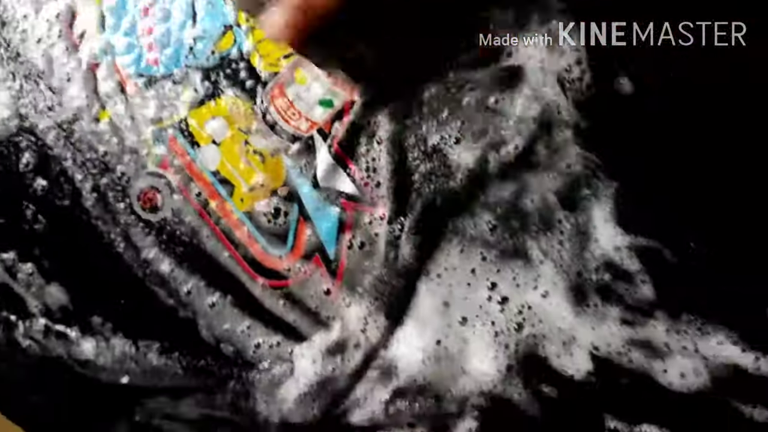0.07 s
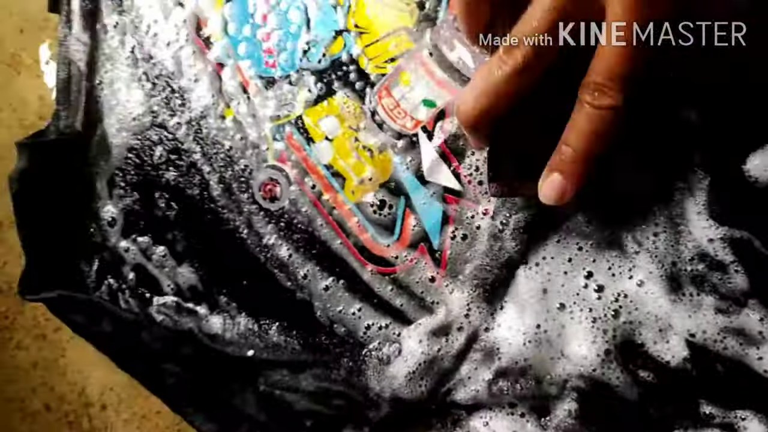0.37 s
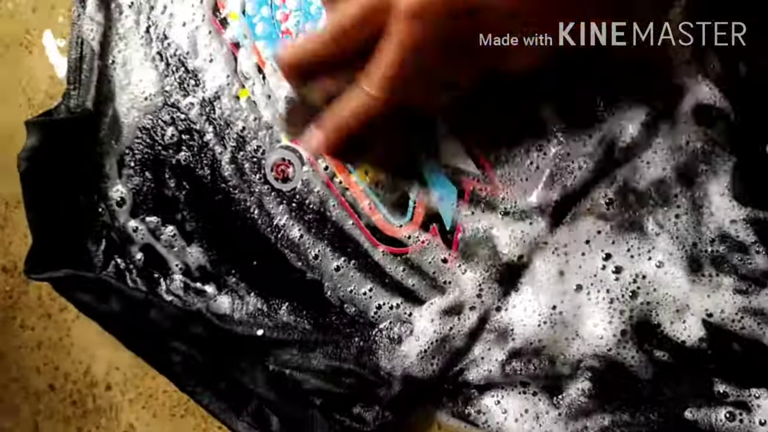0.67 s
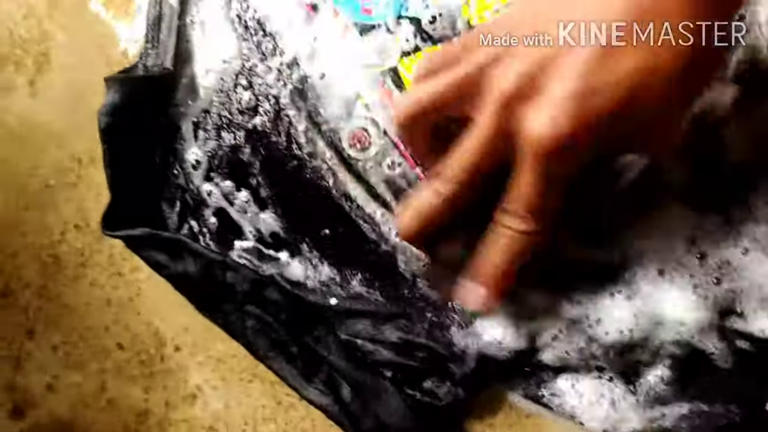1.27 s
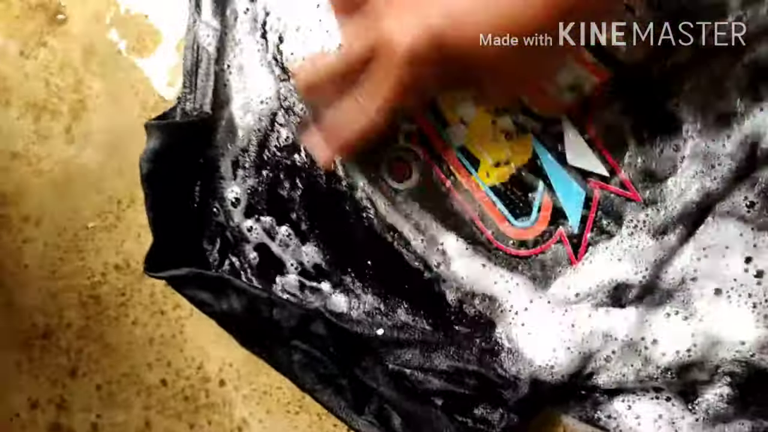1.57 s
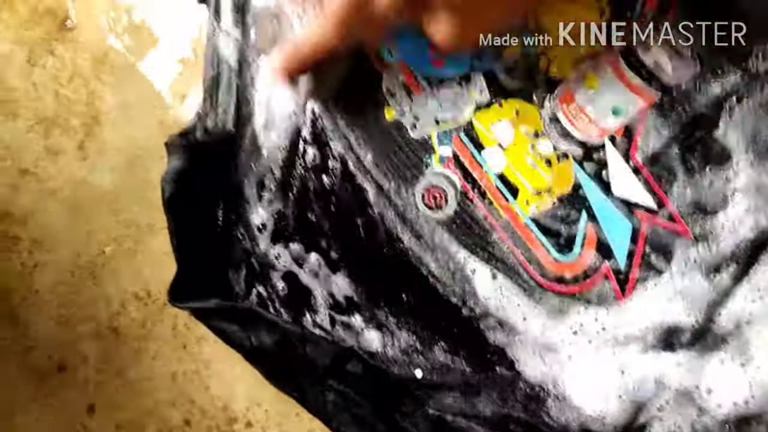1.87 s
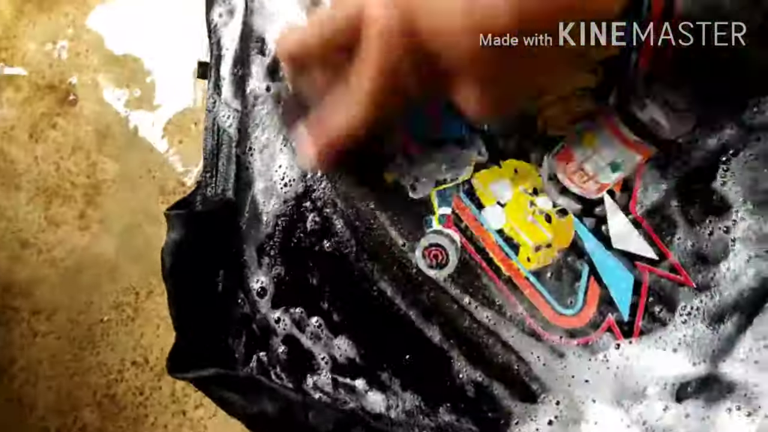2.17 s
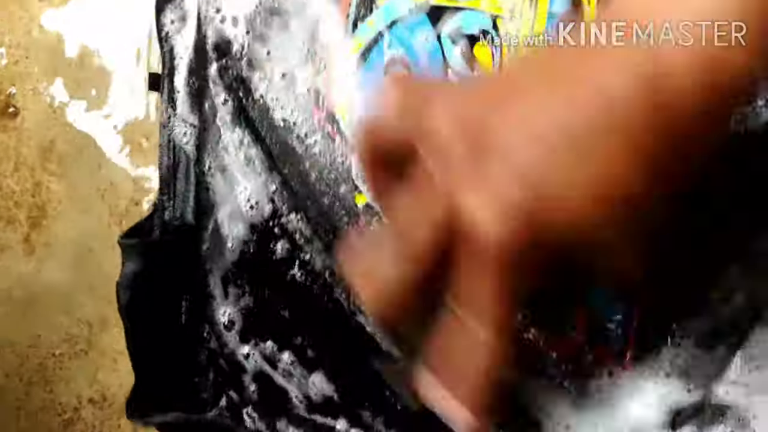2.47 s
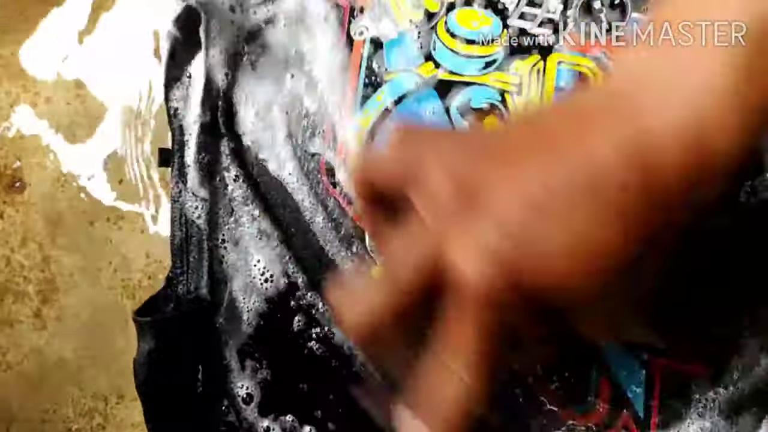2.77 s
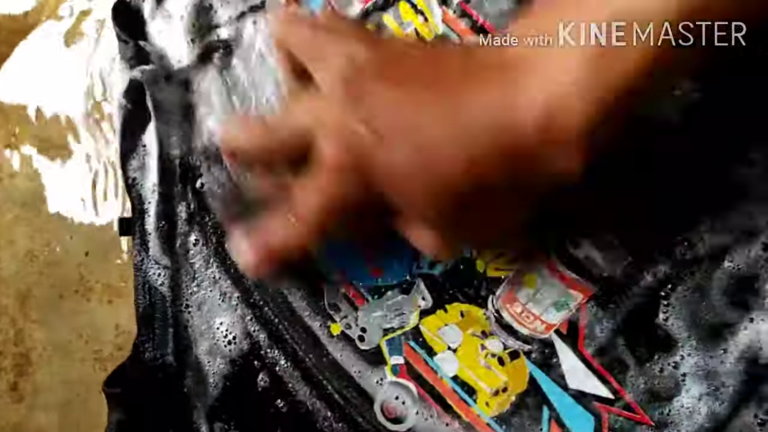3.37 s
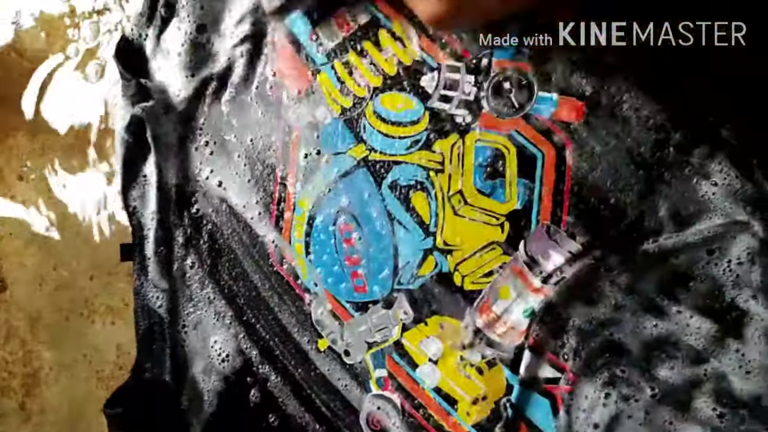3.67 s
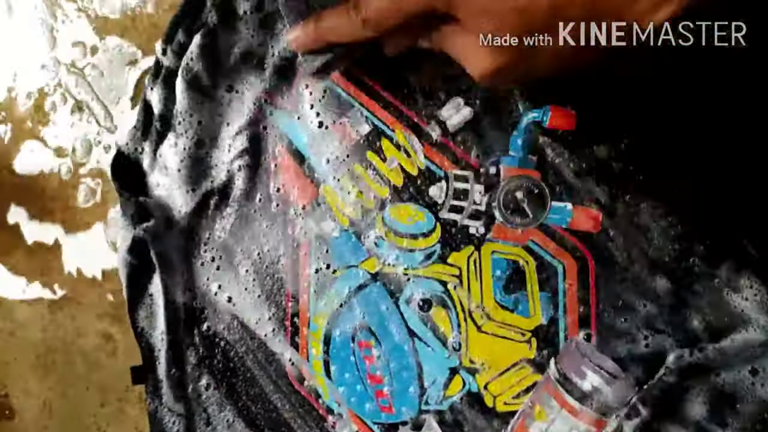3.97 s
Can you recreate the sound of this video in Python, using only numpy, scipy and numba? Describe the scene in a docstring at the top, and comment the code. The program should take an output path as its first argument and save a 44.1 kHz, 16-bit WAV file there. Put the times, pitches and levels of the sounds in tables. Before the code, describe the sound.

Wet, soapy cloth is scrubbed by hand in fast back-and-forth strokes, heard up close with short floor echoes. Foam crackles and water squishes through the fabric, strongest past the middle, over a faint low hum.

```python
"""Wet, fizzing strokes, close to the microphone: a hand scrubs a soaked, soapy shirt on a hard floor.
Each stroke bursts tiny foam bubbles and squeezes water through the cloth, a squelch that rises in pitch
with the speed of the hand and ends in a slurp as it turns. Now and then a full fold gives way and spurts.
Far off, a motor hums and faint whines come and go over a low rumble.
Heard in stereo through two microphone ports, with short echoes from the floor and nearby walls."""
import sys
import numpy as np
from scipy import signal
from scipy.fft import rfft, irfft
from scipy.io import wavfile
from scipy.ndimage import uniform_filter1d
from numba import njit

SR = 44100
rng = np.random.default_rng(int(sys.argv[2]) if len(sys.argv) > 2 else 0)


def generate_wav(signal):
    """Clip the signal to [-1, 1] and save it as 16-bit WAV at the path in sys.argv[1]."""
    frames = np.transpose(np.atleast_2d(signal))
    scaled = np.clip(frames, -1, 1) * 32767
    pcm = np.round(scaled).astype(np.int16)
    wavfile.write(sys.argv[1], SR, pcm)


N = 176400

# strokes of the hand: start t/s, end t/s, place of top speed/share of the stroke,
# relative foam level/dB, relative squelch level/dB, squelch f/Hz at top speed
STROKES = [ (0.008, 0.104, 0.65, -27.5, -35.5, 1670), (0.118, 0.218, 0.53, -26, -34, 2110),
           (0.237, 0.306, 0.55, -26, -34, 2180), (0.323, 0.432, 0.79, -27, -37, 2060),
           (0.448, 0.524, 1, -27, -29, 2170), (0.55, 0.64, 0.37, -33.5, -37.5, 2120),
           (0.648, 0.761, 0.59, -34, -42.5, 1830), (0.761, 0.864, 0.34, -32.5, -37, 2230),
           (0.878, 0.966, 0.51, -26.5, -35, 2160), (0.972, 1.067, 0.38, -29.5, -33, 2590),
           (1.095, 1.203, 0.35, -23.5, -28, 2250), (1.197, 1.302, 0.56, -25, -30.5, 2170),
           (1.335, 1.439, 0.39, -22, -28, 2590), (1.444, 1.553, 0.34, -23.5, -29, 2290),
           (1.561, 1.669, 0.54, -21, -27.5, 2275), (1.672, 1.79, 0.48, -23, -25.5, 2110),
           (1.803, 1.92, 0.45, -19.5, -24.5, 2160), (1.925, 2.055, 0.44, -19.5, -22.5, 2434),
           (2.059, 2.195, 0.49, -18, -26, 2570), (2.189, 2.328, 0.58, -18, -24.5, 2470),
           (2.337, 2.471, .45, -18.5, -24.5, 2750), (2.468, 2.618, 0.6, -18, -25.5, 2700),
           (2.624, 2.773, 0.45, -17.5, -24.5, 2710), (2.767, 2.928, 0.64, -16.5, -29.5, 3220),
           (2.926, 3.077, 0.49, -19, -25, 2970), (3.075, 3.247, 0.42, -19, -28.5, 2900),
           (3.227, 3.391, 0.64, -21, -31, 3280), (3.402, 3.577, 0.29, -21.5, -29.5, 2860),
           (3.558, 3.742, 0.61, -26.5, -27.5, 1967), (3.728, 3.935, 0.46, -29.5, -31, 1860),
           (3.905, 4.078, 0.31, -26, -28.5, 2430)]
# hand speed at which the foam is half released: t/s, speed/share of top speed
RELEASE_SPEED = [(.6, 0.66), (1.2, 0.58), (2.2, 0.62), (3.3, 0.54)]
# spectrum of the bursting foam: f/Hz, relative level/dB
FOAM_SPECTRUM = [(250, -23), (550, -45), (900, -20), (1400, -16.5), (2800, -1.5), (3600, -4.5), (4800, -3),
                 (6500, -2.5), (8300, 2), (10000, 4.5), (11400, 2), (13000, -11), (15500, -17.5)]
# flicker of the fizz, steadier in the high treble: f/Hz, level spread/dB
FIZZ_FLICKER = [(4000, 4.2), (9000, 2.4)]
# dull rub of the cloth, heaviest in the sodden folds: t/s, level/dB relative to the water flow
CLOTH_RUB = [(0, -15), (.7, -9.5), (1.2, -20), (3.5, -26), (4, -17)]
# folds full of water giving way: t/s, relative level/dB, f/Hz
SPURTS = [(0.062, -34, 1410), (0.177, -29.5, 2040), (0.279, -26.5, 1900), (0.403, -27, 1930),
          (0.606, -25.5, 1890), (0.684, -30, 1750), (1.458, -40, 2060), (3.354, -26.5, 2040),
          (3.424, -31, 3100), (3.613, -21.5, 1610), (3.700, -30, 1610), (3.939, -25.5, 1880)]
# running speed of the distant motor: t/s, rotation f/Hz
MOTOR_SPEED = [(0, 17.5), (.3, 19.2), (.6, 20), (2.8, 19.9), (3.2, 18.6), (4, 18.2)]
# swell of its hum: t/s, gain/dB
MOTOR_SWELL = [(0, -6), (.6, 0), (1.5, 0.5), (1.9, 4.5), (2.3, -1.5), (2.7, 1.5), (3.2, 0.5), (3.6, -6)]
# its harmonics: multiple of the rotation, level/dB before the swell
MOTOR_HARMONICS = [(5, -58.5), (6, -59), (7, -55), (11, -62.5), (13, -64.5), (17, -64.5)]
# far-off whines and hums: start t/s, end t/s, f/Hz, level/dB
WHINES = [(-.1, .3, 399, -61), (.45, 2.45, 160.3, -50), (.68, 1.08, 564, -61), (2.3, 2.75, 481, -63),
          (2.7, 3.1, 462, -62), (3.25, 3.9, 323, -60)]
# spectrum of the background rumble: f/Hz, relative level/dB
RUMBLE_SPECTRUM = [(25, -4), (55, -3.5), (100, -3), (160, 5.5), (230, -2), (330, -4), (600, -16),
                   (1400, -13.5), (3000, -9), (12000, -23.5)]
# balance of the microphone ports: f/Hz, left minus right level/dB
PORT_BALANCE = [(100, 1.2), (330, 4.5), (1200, -.3), (2400, 1.2), (4400, 1), (8100, -.5), (10500, 1.5),
                (12500, 5)]

TURN_HZ, TOP_HZ = 1506.0, 15700  # squelch pitch as the hand turns; upper limit of the microphone


def undb(db):
    """Decibels to amplitude."""
    return 10 ** (np.asarray(db) / 20)


def unit(x):
    """Scale to an RMS of 1."""
    return x / np.sqrt(np.mean(x ** 2) + 1e-18)


def curve(x, points):
    """Value at x on straight lines between the points."""
    return np.interp(x, *np.array(points).T)


def response(points):
    """Gain at each frequency for points of f/Hz, level/dB."""
    hz, db = np.array(points, float).T
    return undb(np.interp(np.log(np.arange(N // 2 + 1) * SR / N + 1), np.log(hz), db))


def colour(x, points):
    """Give a sound a spectrum, at unit level."""
    return unit(irfft(rfft(x) * response(points), N))


def walk(per_s):
    """Smooth random drift with a spread of 1."""
    hold = max(int(SR / per_s), 1)
    steps = np.repeat(rng.standard_normal(N // hold + 1), hold)
    return unit(uniform_filter1d(steps, hold)[:N])


@njit
def bandpass(x, hz, width):
    """Band-pass with a moving centre; width is a share of the centre."""
    y, band_state, low_state = np.empty(len(x)), 0., 0.
    for i in range(len(x)):
        g = np.tan(np.pi * hz[i] / SR)
        band = (band_state + g * (x[i] - low_state)) / (1 + g * (g + width))
        band_state = 2 * band - band_state
        low_state += 2 * g * band
        y[i] = width * band
    return y


def cavity(x, hz, width):
    """A steep-sided resonance of a wet pocket in the cloth."""
    hz = np.clip(hz * np.ones(N), 50, SR / 3)
    return unit(bandpass(bandpass(x, hz, float(width)), hz, float(width)))


def pops(per_s, spread_db):
    """Random clicks of uneven size."""
    size = undb(spread_db * np.minimum(rng.exponential(size=N), 6)) * rng.choice([-1, 1], N)
    return unit(size * (rng.random(N) < per_s / SR))


def ports(source, shared=0.21, lag_s=0.00007):
    """Two microphone ports hear a wide source partly alike, the left a little later."""
    common, left, right = source(), source(), source()
    late = np.roll(common, round(lag_s * SR))
    return np.sqrt(shared) * np.array([late, common]) + np.sqrt(1 - shared) * np.array([left, right])


def hand(t, gather_db=3):
    """Each stroke speeds up and slows down; speed sets the foam, the water flow and the squelch pitch."""
    foam, flow, pitch = np.zeros(N), np.zeros(N), np.full(N, TURN_HZ)
    for start, end, top_place, foam_db, squelch_db, top_hz in STROKES:
        fastest = start + np.clip(top_place, .1, .9) * (end - start)
        i = slice(int(start * SR), int(end * SR))
        speed = np.abs(np.sin(np.pi * np.interp(t[i], [start, fastest, end], [0, .5, 1])))
        grip = (speed / curve(start, RELEASE_SPEED)) ** 3.76
        burst = grip / (1 + grip)
        foam[i] += undb(foam_db) * burst / burst.max()
        piled_db = gather_db * (t[i] - start) / (end - start)  # water piles up before the hand
        flow[i] += undb(squelch_db + piled_db) * speed ** 0.53
        pitch[i] += (top_hz - TURN_HZ) * speed ** 3.04
    return foam, flow, pitch


def flicker(x, band_hz=400):
    """The fizz flickers unevenly, each narrow band swelling and fading at random."""
    hz, spectrum, out = np.arange(N // 2 + 1) * SR / N, rfft(x), 0
    for centre in np.arange(0, TOP_HZ + band_hz, band_hz):
        band = irfft(spectrum * np.maximum(1 - np.abs(hz - centre) / band_hz, 0), N)
        swell_db = curve(centre, FIZZ_FLICKER) * np.minimum(walk(45), 2)
        out = out + band * undb(swell_db)
    return unit(out)


def fizz(foam):
    """Thousands of foam bubbles burst under the fingers, in clumps; hard strokes also rasp the weave."""
    lingering = 0.08 * uniform_filter1d(foam, int(.2 * SR))
    sizzle = flicker(ports(lambda: colour(pops(15000, spread_db=2), FOAM_SPECTRUM)))
    rasp_hz = 5180 * 2 ** (0.25 * walk(30))
    rasp = foam ** 2 / foam.max() * ports(lambda: cavity(pops(2300, spread_db=2.5), rasp_hz, width=0.26))
    clumps = undb(.7 * walk(450))
    return clumps * ((foam + lingering) * undb(-0.5) * sizzle + undb(-7.5) * rasp)


def bubbles(pitch, per_s, cycles, glide=0.0855, scatter_oct=0.2, spread_db=2.5):
    """Larger bubbles ring around the squelch pitch, each gliding up as it dies away."""
    out = np.zeros(2 * N)
    for when, size, scatter in rng.random((int(per_s * N / SR), 3)):
        i = int(when * N)
        hz = pitch[i] * 2 ** (scatter_oct * np.log(scatter / (1 - scatter)).clip(-2, 4))
        age = np.linspace(0, 4, int(4 * cycles * SR / hz) + 2)  # in decay times of `cycles` periods
        ring = np.exp(-age) * np.sin(2 * np.pi * cycles * age * (1 + glide * age / 2))
        out[i:i + len(age)] += undb(-spread_db * np.log(max(size, .01))) * ring
    return unit(out[:N])


def squelch(t, flow, pitch):
    """Soapy water is forced through the weave, with bubbles, wet squeaks and the dull rub of the cloth."""
    wavering = pitch * 2 ** (0.153 * walk(60))
    water = ports(lambda: cavity(pops(4000, spread_db=-1), wavering, width=1))
    rub = ports(lambda: cavity(pops(2500, spread_db=1.5), hz=1140, width=5.7))
    rub *= undb(curve(t, CLOTH_RUB))
    gulps = undb(1.6 * walk(90))
    froth = ports(lambda: bubbles(wavering, per_s=600, cycles=9.6))
    squeaks = ports(lambda: bubbles(wavering, per_s=60, cycles=16))
    return flow * gulps * (undb(-18) * water + undb(-17.5) * froth + undb(-14) * squeaks + rub)


def spurts(t, rise_s=0.0015, decay_s=0.013):
    """A fold full of water gives way: a sudden gush with a dull slap and a spray of foam."""
    level, pitch = np.zeros(N), np.full(N, TURN_HZ)
    for start, db, hz in SPURTS:
        age = np.maximum(t - start, 0)
        level += undb(db) * np.minimum(age / rise_s, 1) * np.exp(-age / decay_s)
        pitch[t >= start] = hz
    gush = ports(lambda: cavity(pops(2500, spread_db=4.5), pitch, width=1))
    slap = cavity(rng.standard_normal(N), hz=630, width=0.77)
    spray = ports(lambda: colour(pops(4200, spread_db=4), FOAM_SPECTRUM))
    return level * (gush + undb(-19) * slap + undb(5) * spray)


def slurps(t, centre_hz=1535.0, floor_hz=1150, mean_fall_oct_per_s=24.6, lead_s=0.029, half_s=0.016):
    """As the hand eases off, a wet pocket opens and its resonance falls, a little differently each time."""
    level, pitch = np.zeros(N), np.full(N, centre_hz)
    pockets = rng.uniform(-1, 1, (len(STROKES), 3))
    for (start, end, _, _, squelch_db, _), (tuning, strength, fall) in zip(STROKES, pockets):
        i = slice(int(start * SR), int(end * SR))
        since_peak = t[i] - (end - lead_s)
        level[i] += undb(squelch_db - 8 + 4 * strength) * np.exp(-(since_peak / half_s) ** 2)
        octaves = .25 * tuning - mean_fall_oct_per_s * (1 + fall) * since_peak
        pitch[i] = centre_hz * 2 ** np.minimum(octaves, 1)
    pitch = np.maximum(pitch, floor_hz)
    flutter = undb(2 * walk(120))
    pocket = ports(lambda: cavity(pops(3500, spread_db=1.8), pitch * 2 ** (.14 * walk(110)), width=.22))
    return level * flutter * pocket


def room(x, t60_s=0.13, echo_db=-6):
    """Short echoes reach the microphone from the floor and nearby walls."""
    age = np.arange(SR // 2) / SR
    tail = rng.standard_normal((2, len(age))) * np.exp(-np.log(1000) * age / t60_s) * (age > .004)
    tail /= np.sqrt(np.sum(tail ** 2, axis=1, keepdims=True))
    return x + undb(echo_db) * signal.fftconvolve(x, tail, axes=1)[:, :N]


def motor(t, waver_db=1.2):
    """A distant motor picks up, runs evenly and slows; only its low harmonics reach the microphone."""
    phase = 2 * np.pi * np.cumsum(curve(t, MOTOR_SPEED)) / SR
    hum = 0
    for multiple, db in MOTOR_HARMONICS:
        level = undb(db + waver_db * walk(4))
        hum += level * np.sin(round(multiple) * phase + 2 * np.pi * rng.random() + .1 * walk(6))
    return np.sqrt(2) * hum * undb(curve(t, MOTOR_SWELL))


def whines(t):
    """Faint held tones come and go in the distance."""
    out = 0
    for start, end, hz, db in WHINES:
        swell = np.sqrt(np.abs(np.sin(np.pi * np.interp(t, [start, end], [0, 1]))))
        out += undb(db) * swell * np.sin(2 * np.pi * hz * t + walk(15) / 2)
    return np.sqrt(2) * out


def rumble():
    """Low room tone, most alike at the two ports around 150 Hz."""
    mid, side = (colour(rng.standard_normal(N), RUMBLE_SPECTRUM) for _ in range(2))
    side_gain = response([(25, -2), (60, -2), (150, -24), (300, -6), (1000, 4)])
    side = irfft(rfft(side) * side_gain, N)
    return undb(-50) * np.array([mid + side, mid - side])


def scene():
    """The scrubbing up close with its echoes; motor, whines and room tone behind it."""
    t = np.arange(N) / SR
    foam, flow, pitch = hand(t)
    scrub = fizz(foam) + squelch(t, flow, pitch) + slurps(t) + spurts(t)
    return room(scrub) + motor(t) + whines(t) + rumble()


def record(dry):
    """The microphone's left port is brighter and a little louder than its right; the top is cut off."""
    lean = np.sqrt(response(PORT_BALANCE))
    heard = irfft(rfft(dry) * np.array([lean, 1 / lean]), N)
    return signal.sosfilt(signal.ellip(12, .2, 80, TOP_HZ, fs=SR, output="sos"), heard)


dry = scene()
out = record(dry)
generate_wav(out)
```